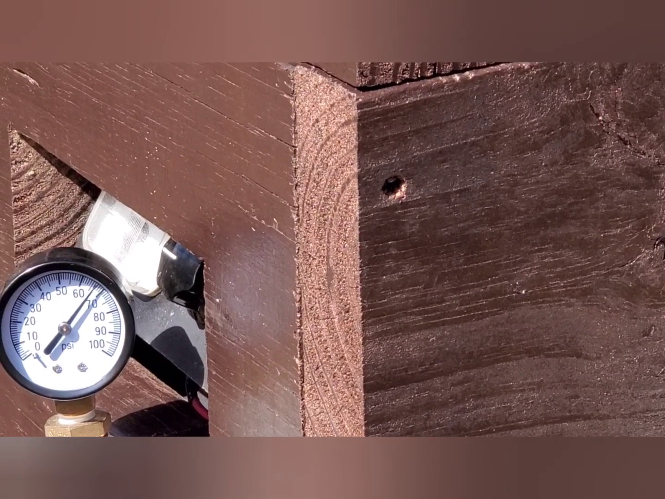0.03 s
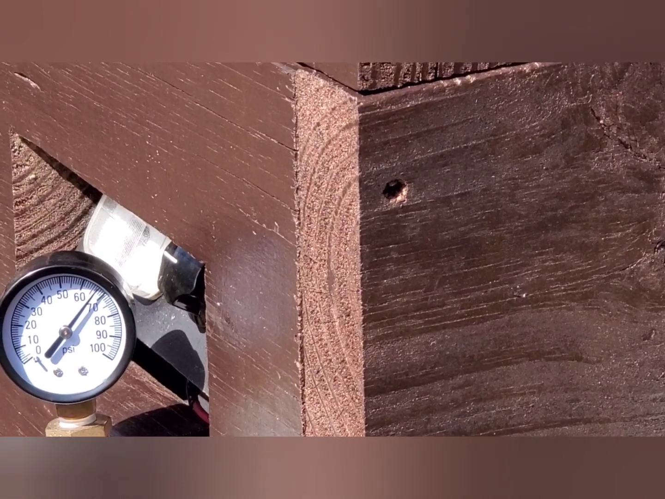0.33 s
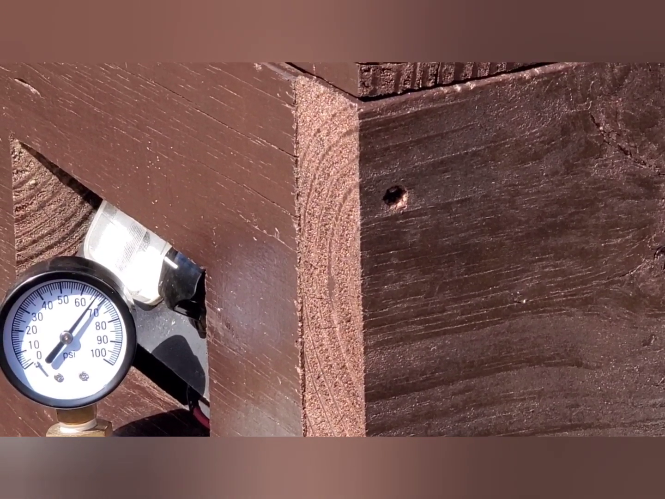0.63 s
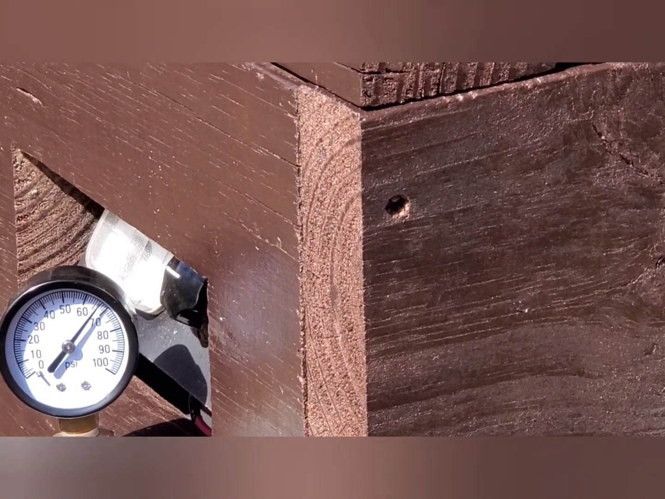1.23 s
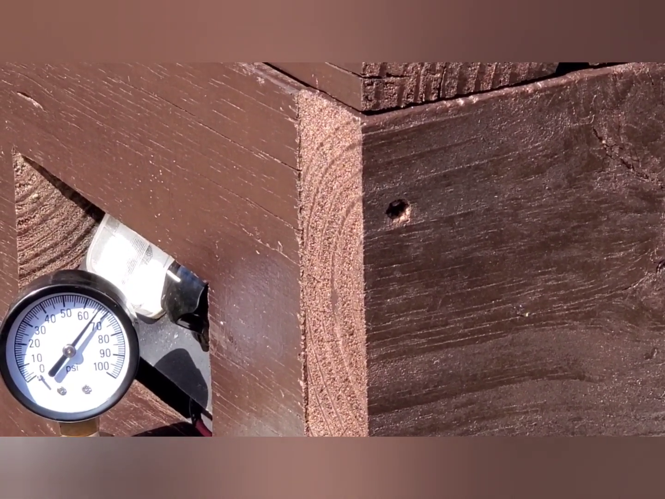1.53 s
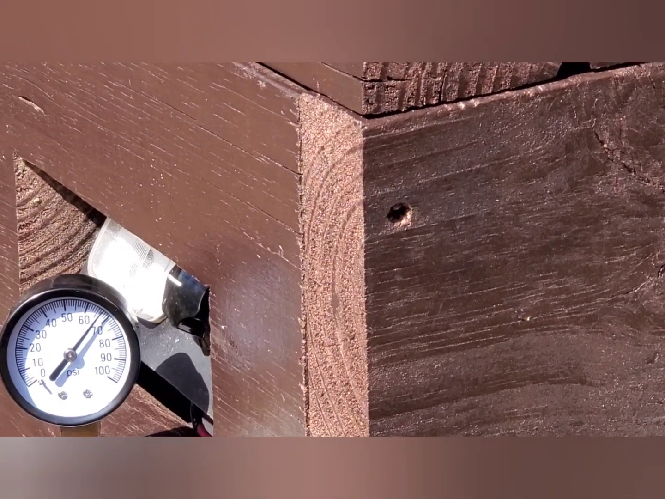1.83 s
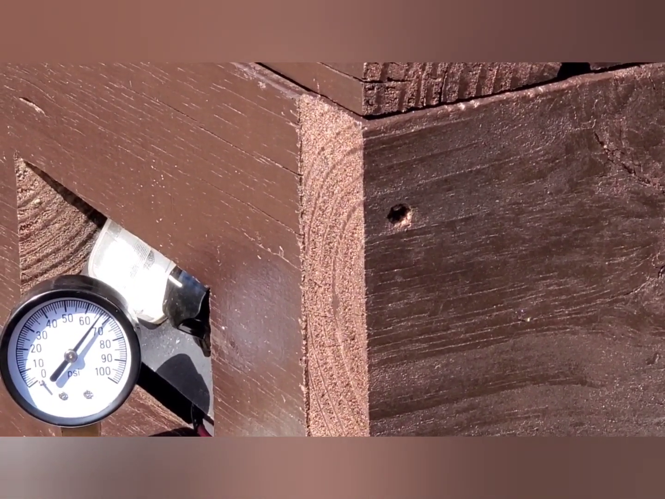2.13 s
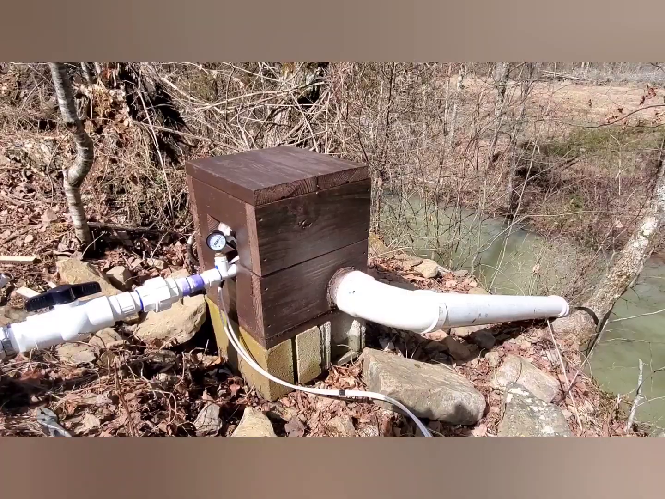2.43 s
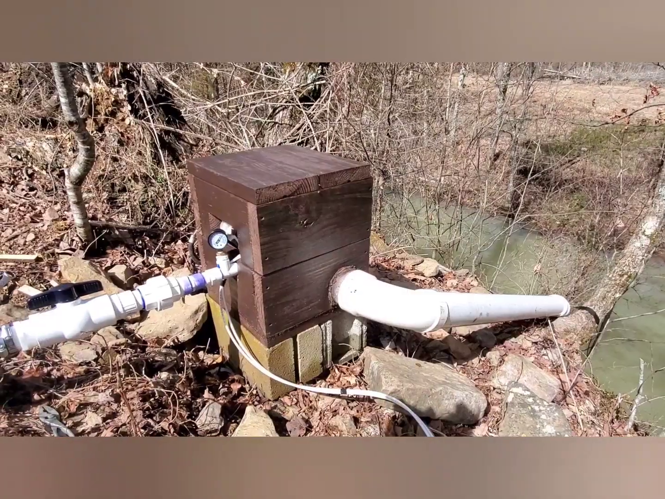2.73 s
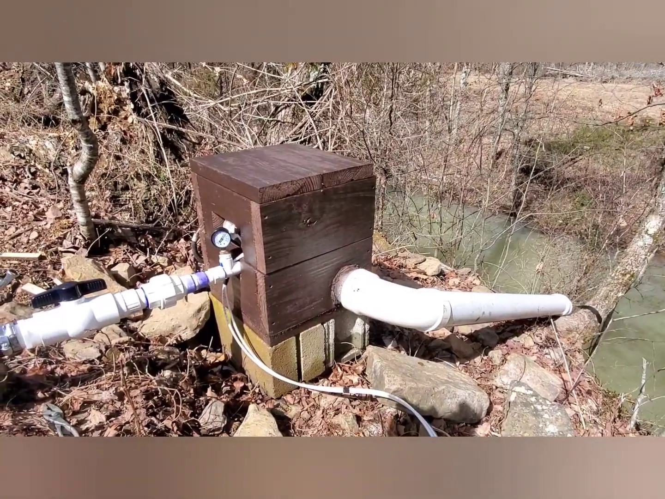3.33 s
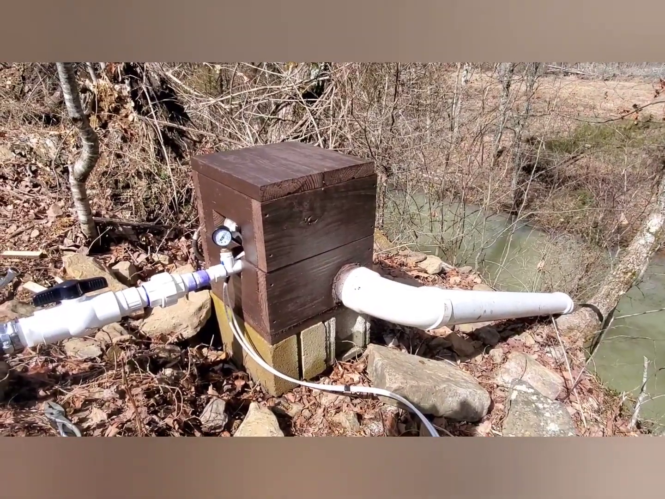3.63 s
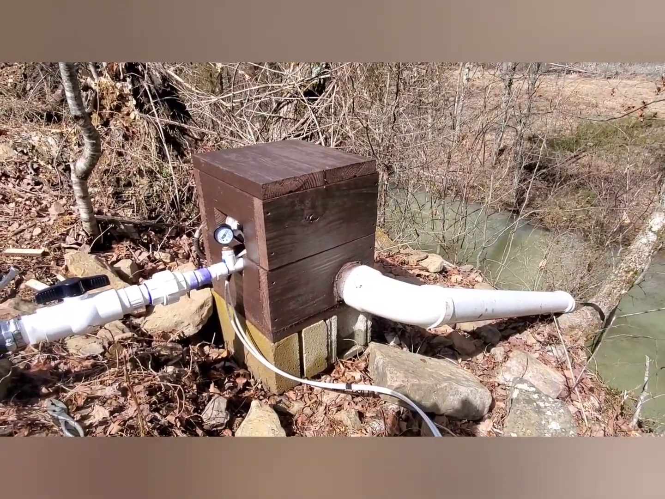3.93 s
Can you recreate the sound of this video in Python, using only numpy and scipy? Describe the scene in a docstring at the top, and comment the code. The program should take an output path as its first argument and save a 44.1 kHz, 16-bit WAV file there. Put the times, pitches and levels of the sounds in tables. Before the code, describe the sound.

A small water turbine hums and drones steadily in a wooden box outdoors, with spray hissing inside. It is heard close up, then, after a split-second gap, quieter from a few steps away as wind buffets the microphone.

```python
"""Small water turbine beside a creek

It runs steadily in a wooden box, heard close up and, after a short silence, from a few steps away.
Its wheel hums at multiples of the shaft speed. The water jet breaking on the wheel's cups sets the box
and drain pipe droning, and spray hisses inside. Gusts of wind and single swirls of air buffet the
microphone, mostly in the far position."""
import sys
import numpy as np
from scipy import signal
from scipy.fft import rfft, irfft
from scipy.io import wavfile
from scipy.ndimage import uniform_filter1d

SR = 44100
rng = np.random.default_rng(int(sys.argv[2]) if len(sys.argv) > 2 else 0)


def materialize(psi):
    """Save the field psi as 16-bit PCM at rate SR to the path in sys.argv[1].

    A 1-D psi becomes a single channel; in a 2-D psi each row is a channel.
    """
    bounded = np.clip(np.atleast_2d(psi).T, -1, 1)
    quanta = np.round(bounded * 32767).astype(np.int16)
    wavfile.write(sys.argv[1], SR, quanta)


N = 176400
T, HZ = np.arange(N) / SR, np.fft.rfftfreq(N, 1 / SR)

# tone colour of the wind's rumble: f/Hz, relative level/dB
RUMBLE = [(10, -24), (28, -12), (55, -1), (90, -1), (140, -11), (260, -15.5), (400, -19), (800, -31),
          (2000, -63), (6000, -78)]
# gusts: peak t/s, half length/s, level/dB, left minus right/dB
GUSTS = [(0.1, 0.043, -39.5, 17), (0.478, 0.024, -47, 11), (1.413, 0.066, -38.5, 11),
         (2.555, 0.073, -29, -0.5), (2.646, 0.025, -32.5, -3), (2.757, 0.036, -27.5, -0.5),
         (2.867, 0.031, -27.5, 0), (2.995, 0.03, -27.5, 0), (3.08, 0.041, -34.5, 1.5),
         (3.15, 0.069, -34, 1.5), (3.264, 0.041, -35, 1.5), (3.465, 0.022, -32, 0), (3.64, 0.032, -34, -3),
         (3.763, 0.046, -33, -4), (3.893, 0.016, -32, -5)]
# single swirls of air: t/s, peak level/dB, left minus right/dB
SWIRLS = [(.099, -26.5, 12), (.4455, -25, 19), (.492, -29, 16), (2.557, -20.5, 3), (2.596, -26.5, 1),
          (2.666, -25, -2), (2.727, -22, 4), (2.758, -23.5, 1), (2.855, -23.5, 1), (2.895, -25.5, -1),
          (3.159, -21, -3), (3.422, -28, -15), (3.466, -22.5, 0), (3.497, -24, 0)]
# tone colour of the spray in each position: f/Hz, left level/dB, right level/dB
SPRAY_CLOSE = [(2200, -70.4, -70.6), (2600, -64.4, -66.1), (3000, -66.1, -65), (3600, -71.3, -68.3),
               (4300, -71.2, -64.6), (5200, -70.2, -67.3), (7100, -72.2, -68.7), (8350, -73.8, -78.2),
               (8700, -69.7, -77), (9050, -76.4, -78.2), (9400, -71.5, -75.4), (10000, -77, -84.4),
               (11000, -74.7, -83), (12000, -74, -75), (13000, -75.5, -77.5), (14400, -73.3, -72.7),
               (15700, -72.4, -73.4)]
SPRAY_FAR = [(2200, -85.5, -85), (2500, -82, -82), (3000, -81.4, -78.6), (3400, -85.7, -79.9),
             (4000, -88, -79.5), (4250, -86.9, -75), (4700, -84.6, -78.6), (5100, -86, -79.6),
             (5400, -87.3, -82.7), (6600, -85.6, -80.8), (8200, -88.8, -91.3), (8700, -83.4, -93),
             (8950, -90.5, -91.1), (9500, -88.7, -91.7), (10600, -92.4, -95.5), (12000, -88.1, -96.5),
             (13000, -89.9, -96.4), (14000, -90.6, -91.6), (15600, -86.6, -91)]
# where the wet casing rings under the spray: f/Hz, width/Hz, boost/dB
CASING_RINGS = [(2380, 50, 6.5), (2800, 61, 4), (3053, 82, 6.5), (3380, 34, 4), (3463, 27, 4.5),
                (3985, 48, 6), (4370, 54, 7), (4850, 104, 4), (5000, 98, 4), (5980, 120, 3)]
# where the box and pipe ring: f/Hz, width/Hz, peak level/dB
BOX_RINGS = [(136, 25, -61), (179, 22.7, -49.5), (230, 11, -55.5), (270.6, 17, -55.5), (412.4, 22, -50.5),
             (457, 31, -52), (451.6, 13.6, -42.5), (497, 26.4, -49.5), (552, 34, -56), (623, 34, -48),
             (667, 31, -52.5), (706.4, 29.6, -40.5), (800, 24, -58), (840, 49, -50.5), (892, 19, -48.5),
             (956.7, 36, -47), (1029, 20, -49.5), (1195, 99, -59.5), (1276, 79, -59), (1390, 50, -64.5),
             (1560, 36, -58), (1613, 29.3, -45.5), (1645, 26, -48), (1877, 109, -59.5), (2876, 39, -57),
             (4284, 45, -71)]
# churning water that fills in between those peaks: f/Hz, level/dB
CHURN = [(15, -92), (50, -63), (140, -72), (330, -66.5), (800, -71), (1100, -63), (1500, -97), (2000, -82),
         (3000, -80.5), (6000, -105)]
# tones of the wheel: multiple of the shaft speed, level/dB
WHEEL_TONES = [(2, -49), (3, -46), (4, -39.5), (6, -44.5), (10, -49), (14, -35.5), (15, -24), (16, -26.5),
               (17, -45.5), (23, -38.5), (30, -46.5), (31, -47.5), (36, -43.5), (43, -48.5), (44, -57.5)]
# how drone and hum reach each position: f/Hz, left gain/dB, right gain/dB, likeness of the sides (0-1)
PATH_CLOSE = [(60, 2, 2, 0.76), (216, 0, -0.5, 1), (403, 2, -4.5, 0.84), (670, -2.5, 0, 0.97),
              (994, 0.5, -0.5, 0.94), (1620, 0.5, 0.9, 0.89), (2870, 5, 4.5, 0.21)]
PATH_FAR = [(60, -7, 9, 0.7), (190, -19.5, -15, 0.98), (398, -23, -21, 0.78), (606, -19, -17.5, 1),
            (970, -18, -17.5, 0.8), (1740, -16, -15.5, 1), (2850, -14, -6, 0.3), (4260, -8, -0.5, 0.53)]
# slow changes of loudness in each position: t/s, drone and hum gain/dB, spray gain/dB
LEVEL_CLOSE = [(0, -1, -2), (.4, 0, -2.5), (1.2, -0.2, -1.5), (2.35, -0.5, -1.65)]
LEVEL_FAR = [(2.43, -2.5, -2.5), (2.9, -1, -0.52), (3.25, 2.5, -0.3), (3.7, 2.5, 1.6), (4, 3, 1.5)]

SHAFT_HZ = 44.72  # turns a second
CLOSE_END_S, FAR_START_S = 2.3475, 2.429


def amp(db):
    """Turns decibels into a factor to multiply by."""
    return 10 ** (np.asarray(db) / 20)


def unit_level(x):
    """Scales a signal to an average strength (rms) of 1."""
    return x / np.sqrt(np.mean(x ** 2) + 1e-20)


def curves(table):
    """Joins the rows of a frequency table into one curve for each value column."""
    f, *columns = np.transpose(table)
    return np.array([np.interp(np.log(HZ + 1), np.log(f + 1), c) for c in columns])


def drift(rate_hz):
    """A random wobble of strength 1, mostly slower than rate_hz."""
    spectrum = rfft(rng.standard_normal(N)) * (HZ > 0)
    return unit_level(irfft(spectrum / np.sqrt(1 + (HZ / rate_hz) ** 4), N))


def stereo(pair, likeness):
    """Blends two unrelated signals into left and right: likeness 0 is unrelated, 1 is the same."""
    likeness = np.clip(likeness, 0, 1)
    mid, side = np.sqrt((1 + likeness) / 2) * pair[0], np.sqrt((1 - likeness) / 2) * pair[1]
    return np.array([mid + side, mid - side])


def right_delay(lag_s):
    """Multiply a spectrum by this to make the sound arrive later on the right."""
    return np.exp(-2j * np.pi * HZ * np.array([[0], [lag_s]]))


def wind():
    """Air buffets the microphone: a light breeze with short gusts, the strong ones brighter."""
    power = amp(np.where(T < FAR_START_S, -53, -39)) ** 2  # the breeze, close and far
    for peak_s, half_s, db, lean_db in GUSTS:
        gains = amp([[db + lean_db / 2], [db - lean_db / 2]])
        power = power + gains ** 2 * np.exp(-((T - peak_s) / half_s) ** 2)
    force = np.sqrt(power)
    noise = stereo(rng.standard_normal((2, N)), likeness=0.72)
    air = unit_level(irfft(rfft(noise) * amp(curves(RUMBLE)), N))
    # in a gust, the flapping above about 220 Hz grows faster than the rumble below
    flap = irfft(rfft(air) * HZ ** 2 / (HZ ** 2 + 220 ** 2), N)
    return force * (air - flap + flap * unit_level(force) ** 0.28)


def swirls(half_s=0.0026):
    """Each swirl of air pushes on the microphone, then pulls: one soft, low thump."""
    out = np.zeros((2, N))
    for centre_s, db, lean_db in SWIRLS:
        gains = amp([[db + lean_db / 2], [db - lean_db / 2]])
        offset = (T - centre_s) / half_s
        out -= gains * offset * np.exp((1 - offset ** 2) / 2)
    return out


def spray(angle, colour, lag_s, drops_per_s=2500, drop_share=0.12, low_cut_hz=1730, alike_below_hz=3200):
    """Fine mist and separate drops hit the casing, a little harder once a turn."""
    hits = (rng.random((2, N)) < drops_per_s / SR) * rng.choice([-1, 1], (2, N))
    drops = hits * amp(-2.5 * np.minimum(rng.exponential(1, (2, N)), 5))  # some loud, some soft
    mist = rng.standard_normal((2, N))
    water = np.sqrt(1 - drop_share) * mist + np.sqrt(drop_share) * unit_level(drops)
    flow = (1 + 0.031 * np.cos(angle)) * amp(0.84 * drift(rate_hz=90))
    hiss = stereo(rfft(water * flow), likeness=np.exp(-(HZ / alike_below_hz) ** 2))
    hiss *= HZ ** 2 / np.hypot(HZ ** 2, low_cut_hz ** 2)
    ring_db = sum(db / (1 + (2 * (HZ - hz) / width) ** 2) for hz, width, db in CASING_RINGS)
    # small random peaks and dips, about 29 Hz wide, ripple across the hiss
    ripple_db = 2 * unit_level(uniform_filter1d(rng.standard_normal((2, len(HZ))), round(29.2 / HZ[1])))
    shape = np.sqrt(SR / 2) * amp(curves(colour) + ring_db + ripple_db)
    return irfft(hiss * shape * right_delay(lag_s), N)


def box_drone(angle, likeness, steepness=1.9):
    """Spectrum of the box and pipe ringing as the rough, uneven jet pulses with each turn."""
    flow = (1 + 0.13 * np.cos(angle)) * amp(0.44 * drift(rate_hz=40))
    jet = unit_level(rng.standard_normal((2, N)) * flow) * np.sqrt(SR / 2)
    ring_power = sum(amp(db) ** 2 / (1 + (2 * (HZ - hz) / width) ** 2 / steepness) ** steepness
                     for hz, width, db in BOX_RINGS)
    churn_power = amp(curves(CHURN)[0]) ** 2
    return stereo(rfft(jet), likeness) * np.sqrt(churn_power + ring_power)


def wheel_hum(angle, flutter_hz=17.3):
    """The wheel's tones follow the shaft, each fluttering in loudness and timing with the flow."""
    out = np.zeros(N)
    for multiple, db in WHEEL_TONES:
        phase = multiple * angle + 2 * np.pi * rng.random() + 0.25 * drift(flutter_hz)
        flutter = 1 + 0.24 * drift(flutter_hz)
        out += amp(db) * np.sqrt(2) * flutter * np.cos(phase)
    return out


def turbine(path, colour, levels, lag_s):
    """The whole machine from one position: a slightly wavering shaft paces drone, hum and spray."""
    speed_hz = SHAFT_HZ * (1 + 0.001 * drift(rate_hz=4.6))
    angle = 2 * np.pi * np.cumsum(speed_hz) / SR
    left_db, right_db, likeness = curves(path)
    travel = amp([left_db, right_db]) * right_delay(lag_s)
    drone_and_hum = irfft((box_drone(angle, likeness) + rfft(wheel_hum(angle))) * travel, N)
    hiss = spray(angle, colour, lag_s)
    times, drone_db, spray_db = np.transpose(levels)
    return drone_and_hum * amp(np.interp(T, times, drone_db)) + hiss * amp(np.interp(T, times, spray_db))


def scene(fade_s=0.001, tail_db_per_s=-2400):
    """The close position, a moment of silence, then the far position."""
    tail = amp(-15.5 + tail_db_per_s * np.maximum(T - CLOSE_END_S, 0))  # the close sound dies away fast
    fade_out = np.clip((CLOSE_END_S - T) / fade_s, tail, 1)
    fade_in = np.clip((T - FAR_START_S) / fade_s, 0, 1)
    close = turbine(PATH_CLOSE, SPRAY_CLOSE, LEVEL_CLOSE, lag_s=0.000045)
    far = turbine(PATH_FAR, SPRAY_FAR, LEVEL_FAR, lag_s=0.00012)
    return fade_out * close + fade_in * far + (fade_out + fade_in) * (wind() + swirls())


def record(dry):
    """A steep filter removes the highest treble, above 15850 Hz."""
    low_pass = signal.firwin(767, 15850, window=("kaiser", 9), fs=SR)
    return signal.oaconvolve(dry, low_pass[None], "same")


dry = scene()
out = record(dry)
materialize(out)
```